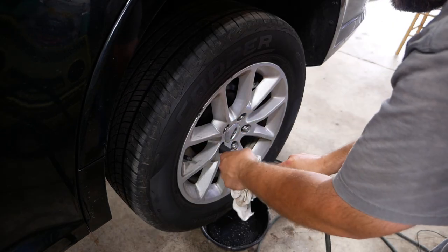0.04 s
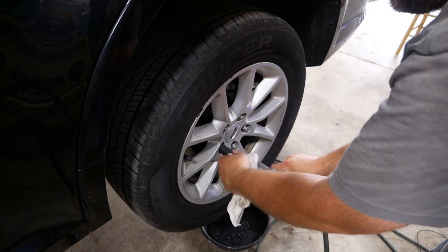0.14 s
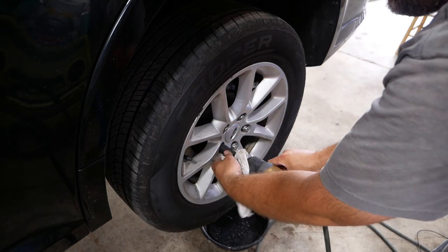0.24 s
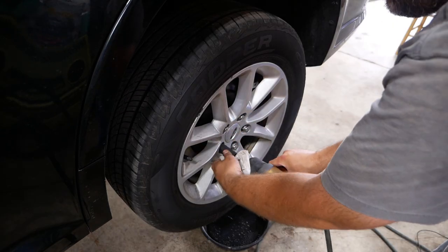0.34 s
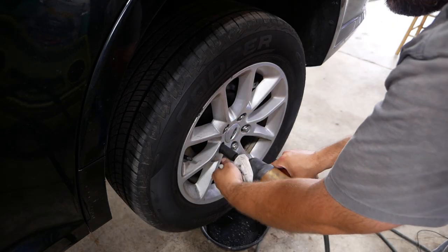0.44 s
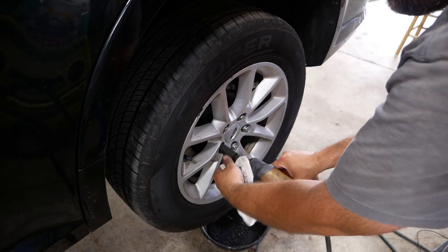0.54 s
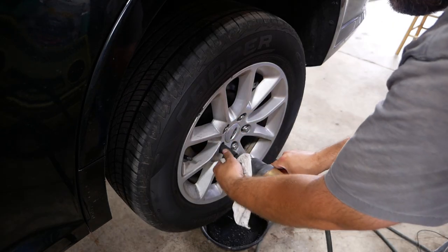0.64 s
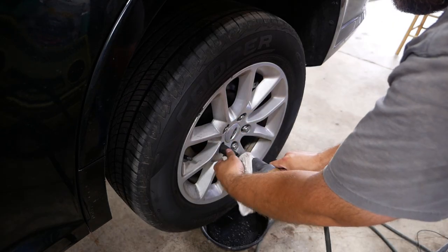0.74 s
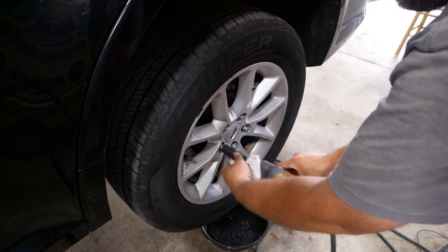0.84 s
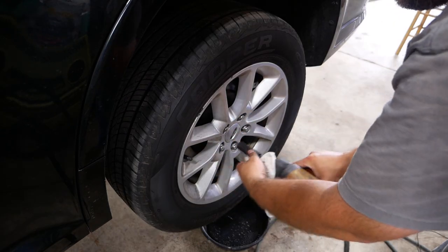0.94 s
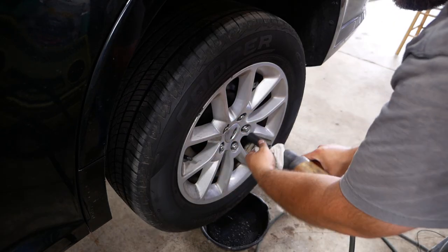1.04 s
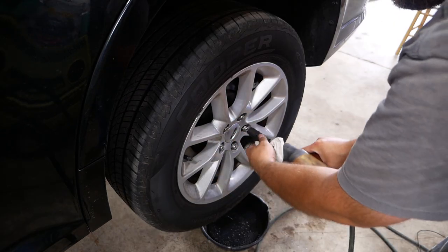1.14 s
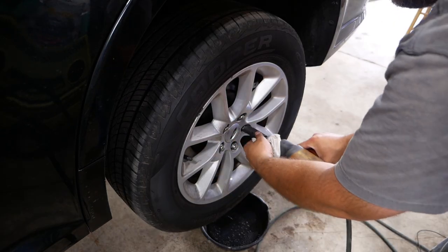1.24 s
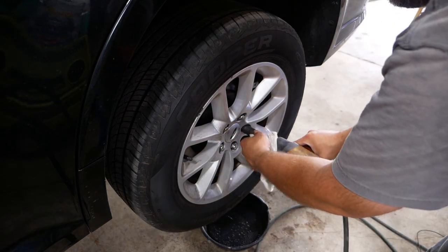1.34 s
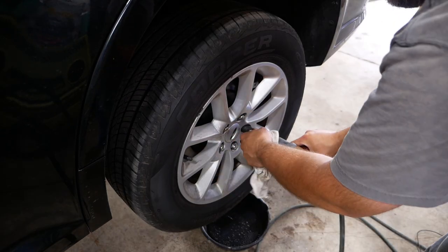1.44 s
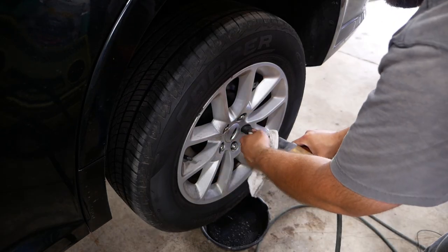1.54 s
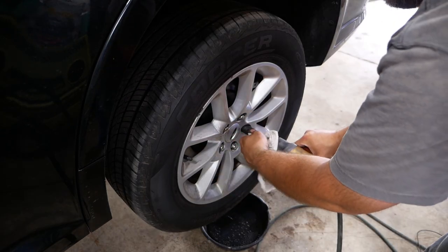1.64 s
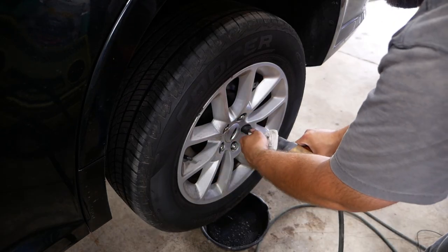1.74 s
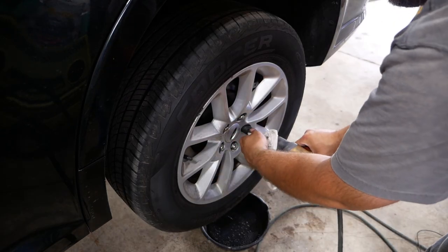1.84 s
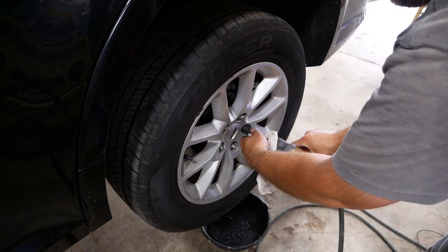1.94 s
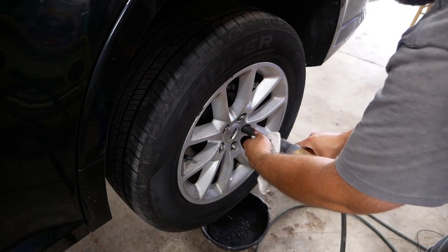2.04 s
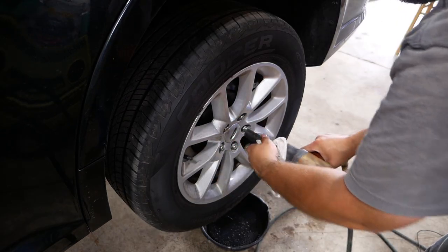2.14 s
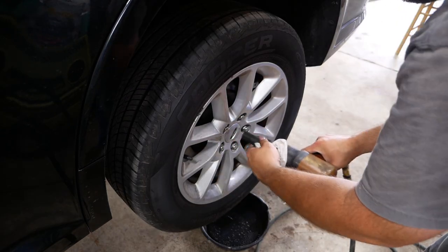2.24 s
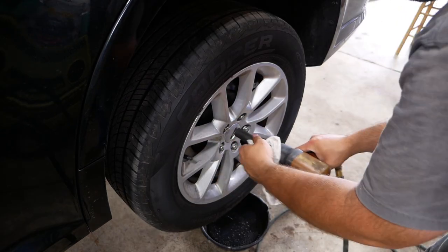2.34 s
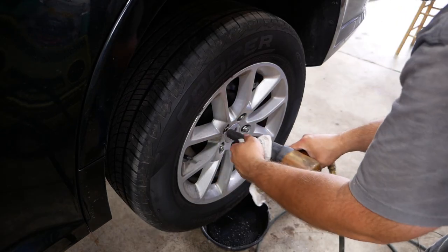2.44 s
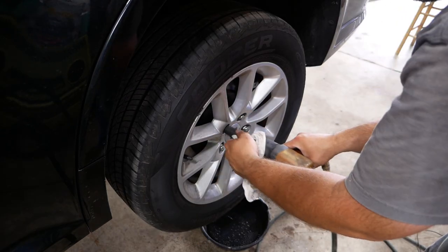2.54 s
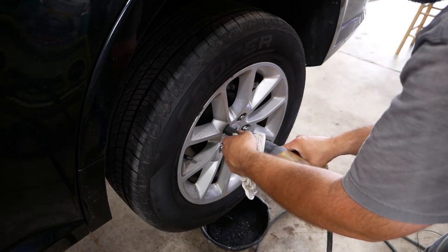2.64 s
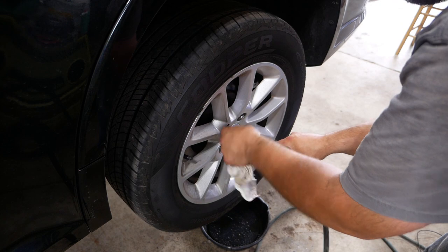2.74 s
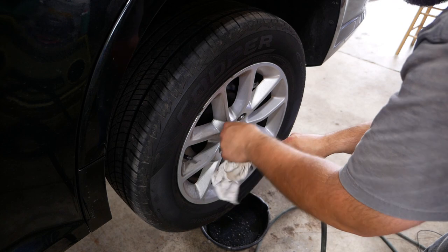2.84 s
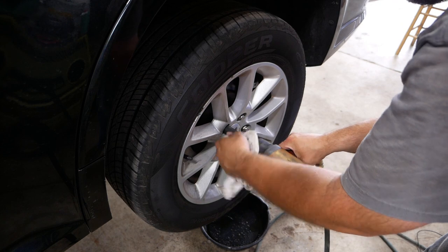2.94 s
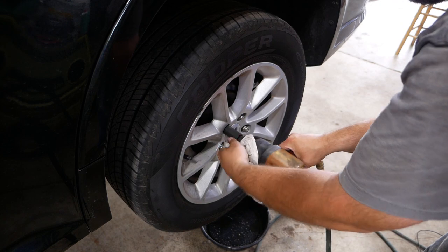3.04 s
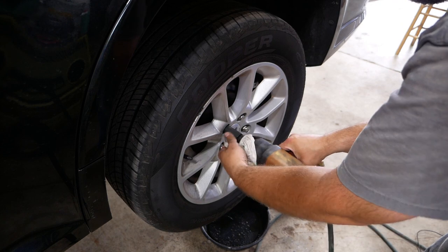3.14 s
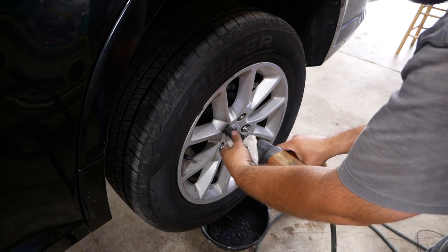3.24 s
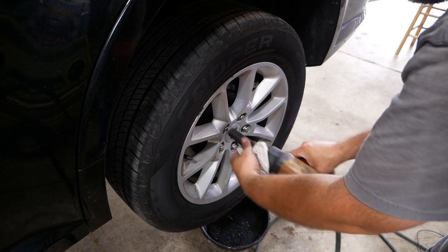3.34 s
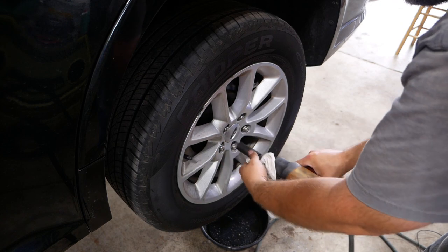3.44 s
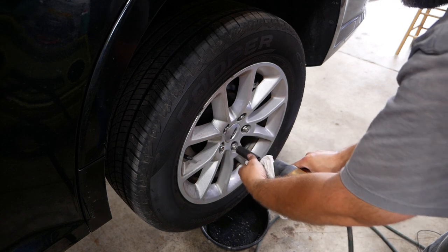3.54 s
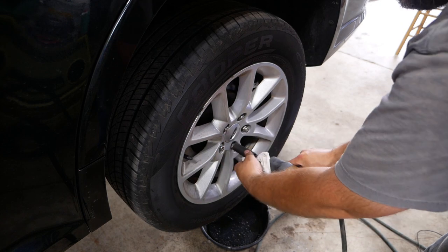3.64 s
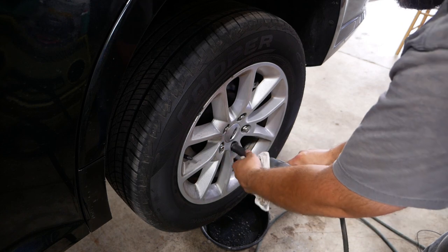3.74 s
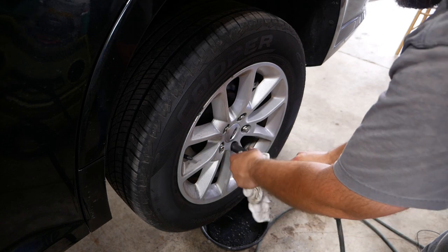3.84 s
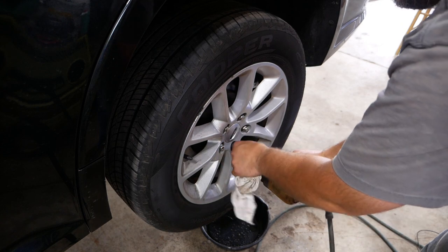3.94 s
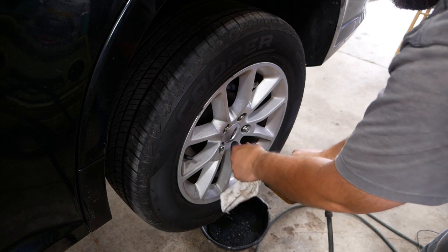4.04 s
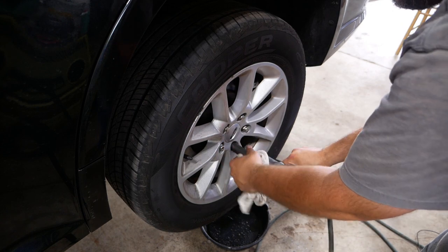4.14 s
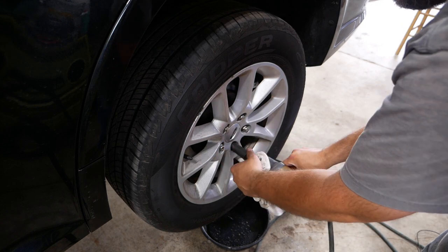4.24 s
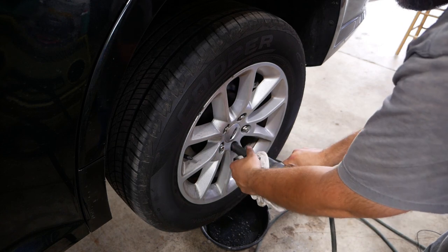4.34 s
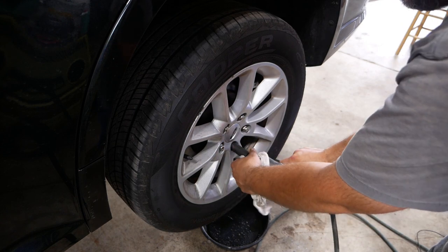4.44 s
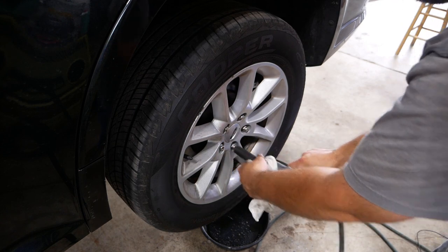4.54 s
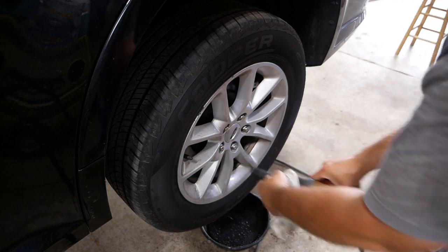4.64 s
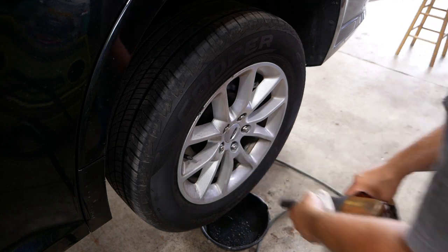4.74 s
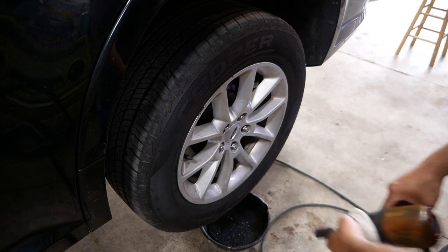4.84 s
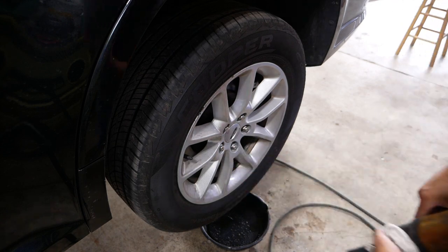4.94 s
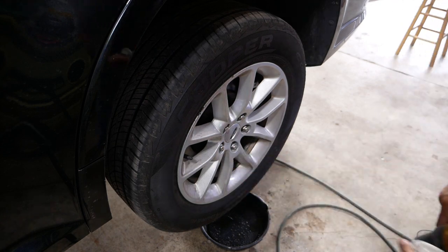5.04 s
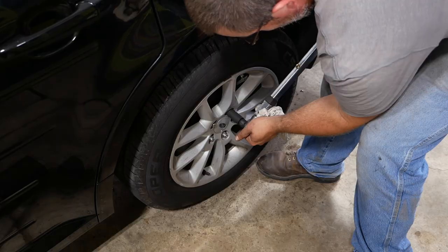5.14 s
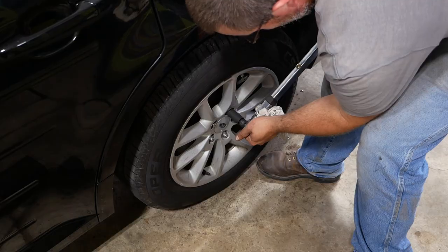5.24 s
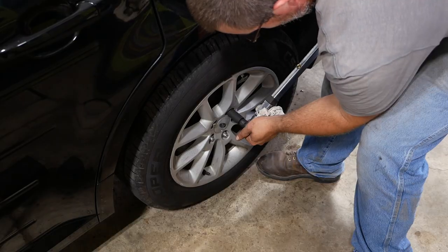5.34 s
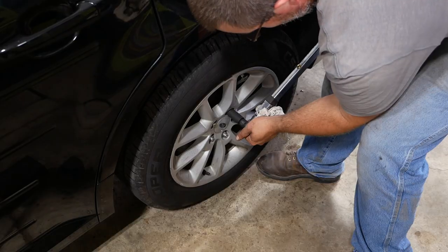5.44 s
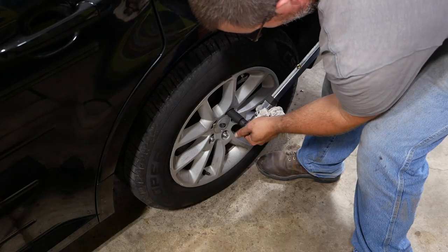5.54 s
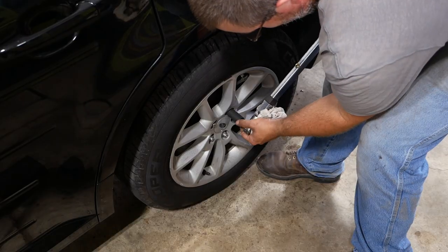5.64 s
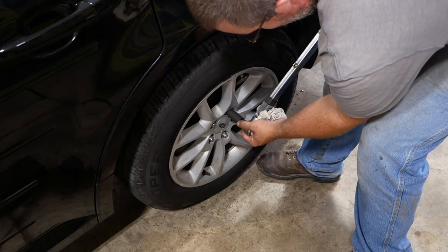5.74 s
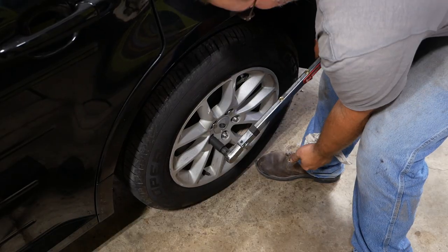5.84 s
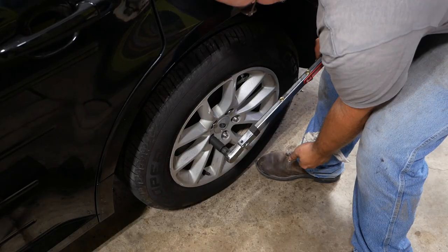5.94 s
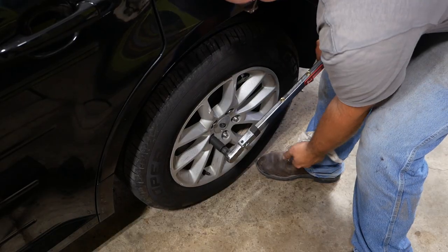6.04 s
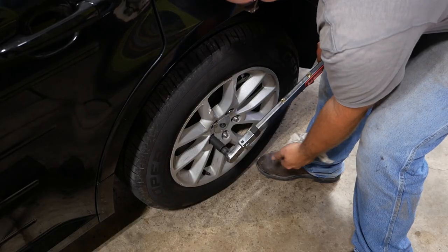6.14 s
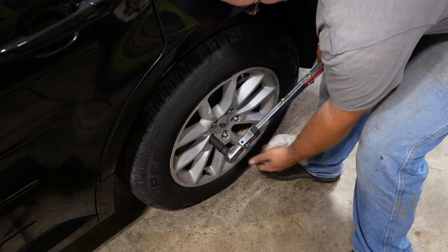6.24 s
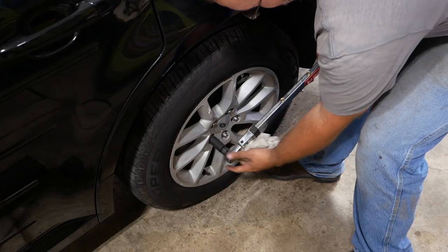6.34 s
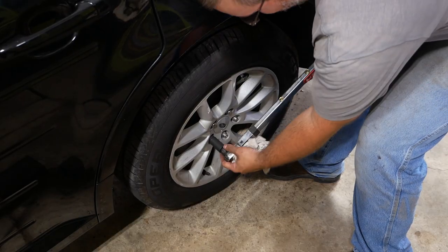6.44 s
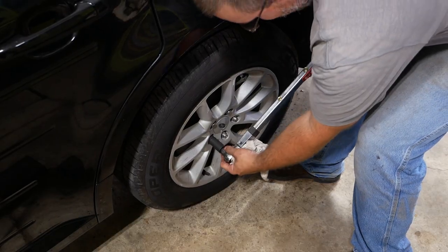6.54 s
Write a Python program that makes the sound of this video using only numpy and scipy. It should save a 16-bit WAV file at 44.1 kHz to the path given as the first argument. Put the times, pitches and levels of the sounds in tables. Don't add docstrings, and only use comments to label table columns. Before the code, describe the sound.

Four short, hammering bursts from an air impact wrench on wheel nuts echo through a garage, with steel clinks between, then sharp torque wrench clicks.

```python
import sys
import numpy as np
from scipy import signal
from scipy.fft import rfft, irfft, next_fast_len
from scipy.io import wavfile
from scipy.ndimage import uniform_filter1d

SR = 44100
rng = np.random.default_rng(int(sys.argv[2]) if len(sys.argv) > 2 else 0)


def amplitude_ratio(level_db):
    exponent = np.asarray(level_db, float) / 20
    return 10 ** exponent


def inscribe(sig):
    pcm = np.round(np.clip(np.atleast_2d(sig).T, -1, 1) * 32767)
    wavfile.write(sys.argv[1], SR, pcm.astype(np.int16))


N = 290178

# t/s, peak level/dB, socket ring level/dB and anvil ring level/dB
# (both against the wheel), loudest wheel spoke f/Hz
HAMMER_BLOWS = [
    [(.5028, -1, -7.5, -3.5, 1970), (.5556, -1.5, -24.5, -0.5, 1660), (.6115, -2, -11, -6, 1710),
     (.6684, -6.5, -28, -1, 1950), (.7257, -1.5, -7, -1, 1690)],
    [(1.724, 1.5, -21.5, 7, 1960), (1.7784, -3, -21.5, -1, 1950), (1.8362, -2.5, -12.5, -6.5, 1710),
     (1.8946, -2.5, -5, -4.5, 1960), (1.955, -0.5, -18, -2, 1730), (2.0168, -1, -1, -2.5, 1330)],
    [(3.0305, 2.5, -11.5, -6, 1900), (3.0819, -1.5, -13.5, 2.5, 1820), (3.1353, -3.5, -17, 0, 1850),
     (3.1921, -1.5, -13, -7, 1860), (3.251, -3.5, -0.5, -5.5, 1570)],
    [(4.2143, 1, -8.5, -10, 1760), (4.2657, 0, -11.5, -2, 1760), (4.3211, -4, -6.5, -1.5, 1990),
     (4.3774, -3.5, -9, -1.5, 1750), (4.4348, -3, -4, 5.5, 1740)],
]
# first hiss t/s, motor start t/s, shut t/s, air thump level/dB, automatic gain while running level/dB
VALVE = [
    (0.442, 0.465, 0.76, -15, 1),
    (1.652, 1.688, 2.043, -16.5, 0.5),
    (2.964, 2.991, 3.284, -10, -4),
    (4.152, 4.172, 4.464, -11, 0),
]
# t/s, peak level/dB, loudest spoke f/Hz,
# socket ring level/dB and anvil ring level/dB (both against the wheel)
SOCKET_CLINKS = [(0.179, -35.5, 2360, -19, -8), (0.206, -22, 1900, -14, -12.5),
                 (0.282, -21.5, 1880, -14.5, -13.5), (0.3601, -38, 1670, -28, -31),
                 (0.8362, -9.5, 1450, -7.5, -4.5), (1.2772, -31, 1900, -10, -17),
                 (1.325, -21.5, 1710, -15.5, -12), (1.382, -24.5, 2760, -12.5, -17.5),
                 (1.475, -24.5, 1850, -11, -5.5), (2.0882, -8, 1900, -6, -7.5), (2.136, -19, 3020, -5, 3),
                 (2.5438, -19.5, 1300, -3.5, -6.5), (2.576, -29, 2230, -18, -21),
                 (2.604, -15.5, 1600, -17.5, -23), (2.7191, -12, 2250, -3.5, -2.5),
                 (2.796, -16.5, 1670, -23, -14), (3.705, -20, 2030, -14, -5.5),
                 (3.791, -15, 2340, 6, -14.5), (3.816, -19, 1610, -19.5, -4.5),
                 (3.91, -22, 2090, -29.5, -11), (3.9794, -12.5, 1550, -15, -9.5),
                 (4.468, -11, 1800, -3.5, -1), (4.5042, -8, 1400, -5, -5), (4.5598, -8.5, 2190, -25, -3.5)]
# t/s, level/dB
SOFT_THUDS = [(0.288, -26.5), (1.482, -30.5), (1.661, -22.5), (1.677, -15.5), (2.543, -27.5),
              (2.611, -33), (2.801, -27), (3.702, -32), (3.8, -29), (3.985, -21), (4.158, -27.5),
              (.455, -29.5)]
# f/Hz, level/dB per Hz
EXHAUST_COLOUR = [(410, -24.5), (700, -6), (1860, -4), (2070, -6), (4460, -14), (5290, -16.5), (6040, -11),
                  (6990, -19), (11200, -11.5), (15700, -33.5), (16500, -50.5)]

SHANK_HZ = 11060
ECHO_HELD_DB = -30.5


def evened(x):
    return x / np.sqrt(np.mean(x ** 2) + 1e-20)


def read(points, hz):
    f, value = np.transpose(points)
    return np.interp(np.log(hz + 1), np.log(f + 1), value)


def coloured(x, points):
    size = next_fast_len(len(x))
    gain = amplitude_ratio(read(points, np.fft.rfftfreq(size, 1 / SR)))
    return irfft(rfft(x, size) * gain, size)[:len(x)]


def add(mix, s, sound):
    part = mix[round(s * SR):][:len(sound)]
    part += sound[:len(part)]


def level(rows):
    s, db = np.transpose(rows)
    t = np.arange(N) / SR
    inside = (t >= s[0]) * (t < s[-1])
    return abs(uniform_filter1d(amplitude_ratio(np.interp(t, s, db)) * inside, size=100))


def ring(drive, modes, detune):
    out = 0
    for hz, width, db in modes:
        r = np.exp(-np.pi * width / SR)
        w = 2 * np.pi * min(hz * detune, 21000) / SR
        out = out + amplitude_ratio(db) * np.sin(w) * signal.lfilter([1], [1, -2 * r * np.cos(w), r * r], drive)
    return out / np.max(abs(out))


def fair(x):
    z = rfft(x)
    lumps = np.sqrt(uniform_filter1d(abs(z) ** 2, size=25)) + 1e-9
    out = irfft(z / lumps ** 0.63, len(x))
    return out * (np.arange(len(x)) < 4500)


def small(x):
    x = signal.sosfilt(signal.butter(2, 680, "high", fs=SR, output="sos"), x)
    return x / np.max(abs(x))


def strike(parts_db, crack_s, rattle_s, rattle_db, spoke_hz, rise_s=0.00037):
    # f/Hz, width f/Hz, level/dB
    wheel_modes = [(980, 370, 1.5), (1450, 410, -14), (1944, 260, 0.5), (2347, 400, 1), (2800, 520, 4.5),
                   (3200, 290, -14), (4400, 200, -7)]
    socket_modes = [(5650, 240, -8), (6080, 210, -1.5), (8400, 1200, -4)]
    anvil_modes = [(8000, 900, -3), (8900, 800, -1), (9800, 800, 0), (12500, 1200, -8), (11080, 130, -10)]
    thin_modes = [(14100, 1800, 10), (14000, 900, -11), (15200, 700, -3)]
    t = np.arange(5000) / SR
    lumps = amplitude_ratio(2.7 * evened(uniform_filter1d(rng.standard_normal(len(t)), size=90)))
    rattle = amplitude_ratio(rattle_db) * lumps * np.exp(-t / rattle_s)
    shape = (1 - np.exp(-t / rise_s)) * (np.exp(-t / crack_s) + rattle)
    noise, detune = rng.standard_normal((4, len(t))), rng.uniform(0.98, 1.005)
    with_spoke = wheel_modes + [(spoke_hz / detune, 190, 4.5)]
    all_modes = (with_spoke, socket_modes, anvil_modes, thin_modes)
    out = 0
    for n, modes, db, brief in zip(noise, all_modes, parts_db, (0.98, 1.24, 1.55, 1.6)):
        out = out + amplitude_ratio(db) * ring(fair(n * shape ** brief), modes, detune)
    return small(out)


def garage(x, colour):
    # f/Hz, t/s
    echo_time = [(60, 0.44), (200, 1.88), (1000, 3.1), (2500, 2.4), (5000, 1.83), (8000, 1.63), (12000, 1),
                 (16000, .5)]
    hz, t, z = signal.stft(rng.standard_normal(2 * SR), SR, nperseg=256)
    tail = signal.istft(z * amplitude_ratio(-60 * t / read(echo_time, hz)[:, None]), SR, nperseg=256)[1]
    wet = coloured(signal.fftconvolve(x, tail)[:len(x)], colour)
    loud = uniform_filter1d(uniform_filter1d(wet ** 2, size=1500), size=1500)
    return wet / np.sqrt(abs(loud) + 1e-12)


def swell(events, against_db, rise_s, db_per_s):
    power = 0
    for s, db, *_ in events:
        top = db + against_db
        power = power + level([(s, top - 11), (s + rise_s, top), (s + rise_s + 1, top - db_per_s)]) ** 2
    return power


def echo_level():
    leftover_db, back_db, db_per_s = -46.5, -32.5, 37.5
    power = level([(0, leftover_db), (1, leftover_db - db_per_s)]) ** 2
    power = power + swell(SOCKET_CLINKS, -28, 0.014, 78.5)
    for hiss, start, shut, _, held_db in VALVE:
        back = shut + 0.14
        power += level([(hiss - .012, -55), (start + 0.023, -24.5 + held_db), (shut, ECHO_HELD_DB + held_db),
                        (back, back_db), (back + 1, back_db - db_per_s)]) ** 2
    return np.sqrt(power)


def shank_echo():
    modes = [(SHANK_HZ, 60, 0), (SHANK_HZ - 110, 90, -4), (SHANK_HZ + 230, 200, 4)]
    return amplitude_ratio(-16) * evened(ring(rng.standard_normal(N), modes, 1))


def socket():
    touches = [(1.318, -30, 1900, -13.5, -24), (1.332, -30, 2020, -18, -10.5),
               (1.481, -31, 2000, -14.5, -10), (2.539, -22, 1490, -23.5, -24),
               (2.56, -25.5, 1970, -21.5, -23.5), (2.585, -28.5, 2500, -12, -9.5),
               (.838, -10.5, 4560, -21.5, -19), (4.561, -13, 4400, -15.5, -20),
               (2.713, -25, 3040, -19.5, -16.5), (3.698, -21, 1800, -10.5, -13),
               (3.784, -23, 2200, -7.5, -7), (3.902, -30, 1990, -22, -16), (3.932, -28, 2500, -4, -1),
               (3.974, -30, 1520, -13, -9), (5.91, -55, 3000, -6, -16), (5.96, -48.5, 3000, -11, -20),
               (.195, -34, 2300, -12, -16), (0.199, -33, 2520, -13.5, -15.5), (.215, -29.5, 1900, -9, -17),
               (.229, -29.5, 2017, -9, -15.5), (.279, -31.5, 903, -20.5, -23.5),
               (.289, -26.5, 1900, -12.5, -10), (1.273, -37.5, 2200, -15, -9.5),
               (1.338, -33, 1800, -13.5, -13), (1.344, -34, 1700, -15.5, -16.5),
               (1.394, -28.5, 2800, -12.5, -11.5), (1.422, -37.5, 3020, -12.5, -17.5),
               (2.611, -20, 1800, -12, -10.5), (2.707, -40, 2000, -14.5, -11),
               (2.801, -23.5, 4500, -14.5, -4.5), (3.88, -33, 1603, -17, -14),
               (3.985, -26, 1600, -13, -3.5), (4.478, -17.5, 2720, -10.5, 6)]
    # t/s, peak level/dB, wheel ring level/dB and
    # socket ring level/dB (both against the anvil), loudest spoke f/Hz
    cam_catches = [(.468, -2, 5, -4.5, 1757), (.703, -15, 1.5, 2, 1800), (1.686, -4.5, 8, -20, 1960),
                   (1.708, -15.5, -39, -25.5, 1900), (1.757, -24, -5, -4, 1900), (1.816, -14, -4, -4, 1796),
                   (1.936, -10.5, 4, -2.5, 1785), (2.996, -7, 12, -6.5, 1685), (3.113, -14.5, -6, 6, 1800),
                   (3.17, -12.5, 1, -13, 1800), (3.229, -11, 1, -1.5, 1820), (4.174, -7, 0.5, -10, 2332),
                   (4.297, -17, -6, -4.5, 1800), (4.412, -10.5, 4.5, 2, 1800),
                   (3.061, -17.5, 3.5, 5.5, 1800), (3.093, -18, 4, -10, 1660), (.562, -12.5, 6, -10, 1480),
                   (4.2, -13.5, 5.5, -11, 2400)]
    # t/s, level/dB, f/Hz
    ring_pings = [
        (.283, -56, 14500),
        (1.325, -49, 13800),
        (2.137, -26.5, 13744),
        (2.716, -44, 13780),
        (3.792, -47.5, 13800),
        (.185, -59.5, 12000),
        (6.509, -38.5, 1720),
        (5.997, -51, 5300),
        (5.997, -61, 3200),
    ]
    out, t = np.zeros(N), np.arange(8000) / SR
    for s, db, spoke_hz, socket_db, anvil_db in SOCKET_CLINKS + touches:
        parts_db = (0, socket_db, anvil_db, -23 + 0.86 * anvil_db)
        add(out, s, amplitude_ratio(db + 0.5) * strike(parts_db, 0.0024, 0.012, -11.5, spoke_hz, .0009))
    for s, db, wheel_db, socket_db, spoke_hz in cam_catches:
        add(out, s, amplitude_ratio(db) * strike((wheel_db, socket_db, 0, -14), 0.0028, 0.015, -6.0, spoke_hz))
    for s, db, hz in ring_pings:
        add(out, s, amplitude_ratio(db - 60 * t / 0.09) * np.sin(2 * np.pi * hz * t))
    return out


def tyre():
    # f/Hz, width f/Hz, level/dB
    cavity_modes = [(100, 62, -25), (199.2, 25, 5), (259, 37, -3.5), (353, 16, 1), (484, 41, 9.5)]
    out = np.zeros(N)
    push = np.r_[np.hanning(120), np.zeros(12000)]
    for s, db in SOFT_THUDS:
        add(out, s, amplitude_ratio(db) * ring(push, cavity_modes, rng.uniform(1.0, 1.02)))
    return out


def exhaust_flow():
    flow = 0
    for hiss, start, shut, thump_db, held_db in VALVE:
        flow = flow + level([(hiss - .014, -56.5),
                             (hiss + .011, -35.5),
                             (hiss + .012, -21.5),
                             (start + .023, thump_db - 6),
                             (start + .077, -26),
                             (shut - .017, -26 + 0.74 * held_db),
                             (shut + .008, -30 + held_db),
                             (shut + .0262, -40.5)])
    return flow


def spin_up(start, end, blow, db, growth):
    # f/Hz, width f/Hz, level/dB
    muffler_modes = [(185, 118, 1.5), (299, 81, -0.5), (518, 135, 9), (1014, 79, 4), (1300, 200, 6),
                     (1900, 420, 1)]
    strike_hz, climb_hz_per_s, crawl_hz = 300, 5900, 150
    t = np.arange(0, end - start, 1 / SR)
    u, phase, noise = t / t[-1], rng.uniform(0, 0.066), rng.standard_normal(SR // 10)[:len(t)]
    left = blow - start - t
    turns = np.cumsum(np.maximum(strike_hz - climb_hz_per_s * left, crawl_hz)) / SR
    turns = turns - np.interp(0, -left, turns, right=turns[-1]) + .58
    turns = turns + 0.077 * uniform_filter1d(noise, size=150) + phase
    puffs = np.exp(-(turns % 1) / 0.071) * (1 + .5 * uniform_filter1d(noise, size=8))
    edge = signal.windows.tukey(len(t), .1) * (0.5 + growth * u)
    tone = evened(ring(puffs - puffs.mean(), muffler_modes, 1.0))
    return -amplitude_ratio(db) * tone * edge, puffs * edge


def blow_dips():
    dip, t = np.zeros(N), np.arange(4000) / SR
    for s, *_ in sum(HAMMER_BLOWS, []):
        add(dip, s, 0.46 * (1 - np.exp(-t / .002)) * np.exp(-(t / 0.027) ** 2))
    return np.clip(1 - dip, .05, 1)


def impact_wrench():
    strokes = [.039, .0335, .0335, .039]
    # start t/s, end t/s, level/dB
    run_on = [
        (0.751, 0.752, -18.5),
        (4.457, 4.478, -23),
    ]
    # t/s, level/dB
    muffler_pops = [
        (0.4705, -13.5),
        (1.6904, -8.5),
        (3, -11.5),
        (4.1774, -12.5),
    ]
    hits, motor, puffing = np.zeros((3, N))
    t, long = np.arange(2000) / SR, np.arange(9000) / SR
    for (hiss, start, shut, thump_db, _), blows, stroke in zip(VALVE, HAMMER_BLOWS, strokes):
        thump = np.sin(2 * np.pi * 195 * t) * np.exp(-t / 0.015) * (1 - np.exp(-t / 0.0019))
        add(hits, start, amplitude_ratio(thump_db) * thump)
        motor_db, growth = -11.5, -.15
        for k, (s, db, socket_db, anvil_db, spoke_hz) in enumerate(blows):
            start = start if k == 0 else s - stroke
            tone, puffs = spin_up(start, s + 0.0055, s, motor_db, growth)
            add(motor, start, tone)
            add(puffing, start, puffs)
            parts_db = (0, socket_db - 1.0, anvil_db, -15)
            add(hits, s, amplitude_ratio(db) * strike(parts_db, 0.00096, 0.0078, -10.5, spoke_hz))
            add(hits, s, amplitude_ratio(db - 31 - 60 * long / 0.077) * np.sin(2 * np.pi * SHANK_HZ * long))
            motor_db, growth = -20.5 + k * 0.12, .05
    for s, db in muffler_pops:
        pop = np.sin(2 * np.pi * 263 * t + .6) * np.exp(-t / .003) * (1 - np.exp(-t / .0003))
        add(hits, s, -amplitude_ratio(db + 7) * pop)
    for start, end, db in run_on:
        add(motor, start, spin_up(start, end, start + 0.029, db, .1)[0])
    jet = evened(coloured(rng.standard_normal(N), EXHAUST_COLOUR))
    dulled = coloured(jet, [(2500, -0.1), (6000, -6.5)])
    air = 0.43 * jet + 3.7 * puffing * dulled
    no_bass = signal.butter(2, 95, "high", fs=SR, output="sos")
    tool = signal.sosfilt(no_bass, hits + motor)
    return tool + amplitude_ratio(3.0) * air * exhaust_flow() * blow_dips()


def torque_wrench():
    # t/s, peak level/dB, handle knock level/dB, broad snap level/dB, ducking t/s
    clicks = [
        (5.3454, 2.5, -13, -11, 0.012),
        (5.7337, -9, -46, -12.5, 0.051),
        (5.996, -41, -23.5, -26, 0.008),
        (6.0687, 4, -18.5, -14.5, 0.0094),
        (6.471, -5, -46, -20, 0.012),
    ]
    head_hz = [810, 2400, 2680, 4000, 4800, 5165, 5425, 5560, 5700, 5880, 6150, 6890, 7780, 8280, 9050,
               9560, 10400, 10850, 11080, 11750, 12350, 13200, 13830, 14300, 14575, 15200]
    # level/dB, time to die by 60 dB t/s
    head_modes = [(-30.5, 0.3), (-27, 0.054), (-28, 0.074), (-26.5, 0.03), (-16, 0.025), (6.5, 0.029),
                  (-1, 0.026), (-14, .025), (-21, 0.02), (-20, 0.03), (-13, 0.055), (-17.5, 0.05),
                  (-23, 0.03), (-13.5, 0.029), (-10.5, 0.036), (-9.5, 0.031), (-9.5, 0.0252),
                  (-15.5, 0.019), (-17, 0.03), (-26, .025), (-24, .025), (-26, .03), (-10, 0.04),
                  (-12, 0.033), (-16, .03), (-17, .025)]
    neighbours_db = [-2, -10, 0, 4, -8]
    # f/Hz, width f/Hz, level/dB
    handle_modes = [(810, 60, -3), (2240, 120, -6), (2390, 97, -3), (2700, 100, -5), (3520, 400, 0.5),
                    (4950, 200, -5)]
    near, full, t = np.zeros(N), np.zeros(N), np.arange(6000) / SR
    top = np.argmax(np.transpose(head_modes)[0])
    for (s, db, knock_db, snap_db, duck_s), beside_db in zip(clicks, neighbours_db):
        turn = rng.random(len(head_modes))
        turn[top:top + 4] = 0
        modes = [amplitude_ratio(m_db - 60 * t / t60) * np.sin(2 * np.pi * (hz * t + p))
                 for hz, (m_db, t60), p in zip(head_hz, head_modes, turn)]
        strong = modes[top] + amplitude_ratio(beside_db) * sum(modes[top + 1:top + 4])
        head = strong + sum(modes[:top] + modes[top + 4:])
        peak = np.max(abs(strong))
        knock = amplitude_ratio(knock_db) * np.sin(2 * np.pi * 1000 * t) * np.exp(-t / 0.0016)
        burst = rng.standard_normal(len(t)) * (np.exp(-t / 0.0016) + 0.07 * np.exp(-t / 0.018))
        snap = amplitude_ratio(snap_db + 9.0) * small(fair(burst))
        click = amplitude_ratio(db) * (head / peak + knock + snap) * (1 - np.exp(-t / 0.00012))
        hum = amplitude_ratio(-20) * ring(1. * (t == 0), handle_modes, 1)
        spread = sum(modes) - 0.79 * modes[top]
        add(full, s, amplitude_ratio(db) * (spread / peak + 0.74 * snap + hum))
        slip = np.sin(2 * np.pi * 2500 * t) * np.exp(-t / 0.00035)
        add(near, s - 0.00051, amplitude_ratio(db - 17.5) * slip)
        add(near, s, click * np.exp(-t / duck_s))
        add(near, s + 0.0041, amplitude_ratio(-20) * click * np.exp(-t / 0.012))
    return near, full


def thinned(x):
    # f/Hz, level/dB under the loudest band
    masked = [(6000, 58.5), (9000, 50), (11200, 40), (12000, 28.5), (14000, 40), (15600, 35.5),
              (16300, 13.5)]
    hz, t, z = signal.stft(x, SR, nperseg=1024)
    band_db = 10 * np.log10((abs(z[:512]) ** 2).reshape(64, 8, -1).mean(1) + 1e-16)
    whim_db = 4 * np.repeat(rng.standard_normal((64, len(t))), 5, axis=1)[:, :len(t)]
    faint = band_db + whim_db < band_db.max(0) - read(masked, hz[4:512:8])[:, None]
    z[:512] *= np.repeat(1. - faint, 8, 0)
    return signal.istft(z, SR, nperseg=1024)[1][:N]


def side_of(mid):
    # f/Hz, side against mid level/dB
    side_width = [(60, -24.5), (180, -22.5), (550, -19), (1650, -20), (4970, -16), (15000, -11.5)]
    hz, t, z = signal.stft(mid, SR, nperseg=1024)
    moments = np.repeat(rng.random(len(t)), 3)[:len(t)] < .14
    patches = rng.random((len(hz) // 12 + 1, len(t)))
    spots = np.repeat(np.repeat(patches, 12, 0), 2, 1)[:len(hz), :len(t)] < .1
    noise = np.exp(2j * np.pi * rng.random(z.shape)) * uniform_filter1d(abs(z), size=9, axis=0)
    return coloured(signal.istft(noise * (moments | spots), SR, nperseg=1024)[1][:N], side_width)


def scene():
    # f/Hz, level/dB
    walls = [(40, -23.5), (140, -13), (300, 3), (1000, -2.5), (1900, -2.5), (3400, 1), (7000, 1),
             (12000, -7), (16000, -6)]
    walls_click = [(500, -2), (800, 2.5), (1500, -1.5), (2500, 10), (4000, 1.5), (7000, 5.5), (11000, -4),
                   (12200, -7), (14000, -4.5), (16000, -3)]
    # t/s after the click, level/dB
    click_echo = [
        (.004, -25.5),
        (.043, -38.5),
        (.11, -38.5),
        (.22, -35),
        (.385, -39.5),
        (.41, -38.5),
        (.445, -39),
        (.52, -46),
    ]
    # release t/s, scene change t/s, level/dB
    shots = [
        (5.346, 5.842, 1.5),
        (6.064, 6.578, 0),
    ]
    # f/Hz, level/dB per Hz
    room_colour = [(20, 7), (60, -4.5), (200, -5.5), (500, -12), (2800, -23), (7000, -32.5), (12000, -32.5),
                   (16500, -53)]
    rumble_colour = [(20, 0), (90, -16), (125, -16), (136, 4), (148, -14.5), (185, -4), (200, 3),
                     (215, -18), (250, -5.5), (300, -15.5), (400, -41.5)]
    tools, (near, clicks) = impact_wrench() + socket() + tyre(), torque_wrench()
    flow = exhaust_flow()
    far_air = amplitude_ratio(2.5) * evened(coloured(rng.standard_normal(N), EXHAUST_COLOUR)) * flow
    running = uniform_filter1d(1. * (flow > .02), size=400)
    far = (tools + far_air) * amplitude_ratio(4.5 * running)
    earlier = far[4 * SR:5 * SR]
    t = np.arange(N) / SR
    first, wet = t < 5.14, echo_level()
    echo = garage(np.r_[earlier, far], walls)[SR:] * wet * first * blow_dips()
    first_click = t < 5.85
    for (release, end, db), part in zip(shots, (first_click, ~first_click)):
        curve = level([(release + s, db + e_db) for s, e_db in click_echo])
        echo += garage(clicks * part, walls_click) * curve * (t < end)
    quiet = amplitude_ratio(-59) * evened(coloured(rng.standard_normal(N), room_colour))
    lifted = amplitude_ratio(-41.5) * (wet / amplitude_ratio(ECHO_HELD_DB)) ** 0.7
    lifted = np.sqrt(lifted ** 2 + swell(SOFT_THUDS, -10, 0.0035, 122))
    rumble = evened(coloured(rng.standard_normal(N), rumble_colour)) * lifted * first
    echo += shank_echo() * wet * np.sqrt(wet / wet.max()) * first
    socket_tone = evened(ring(rng.standard_normal(N), [(6110, 200, 0)], 1))
    echo += amplitude_ratio(-20) * socket_tone * wet * first
    mid = thinned(tools + near + echo + quiet + rumble)
    side = amplitude_ratio(3.0) * side_of(mid)
    return np.array([mid + side, mid - side])


def roll_off(x):
    return signal.sosfilt(signal.butter(12, 16970, fs=SR, output="sos"), x)


def record(dry):
    dry = np.clip(dry, -.8, .8)
    x = signal.oaconvolve(dry, signal.firwin(255, 15950, fs=SR)[None], "same")
    x = signal.sosfilt(signal.butter(2, 45, "high", fs=SR, output="sos"), x)
    return roll_off(x)


dry = scene()
out = record(dry)
inscribe(out)
```